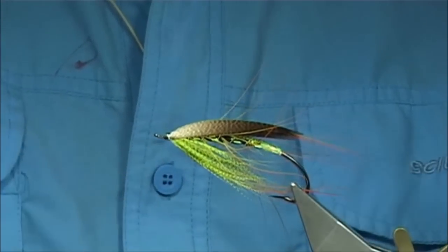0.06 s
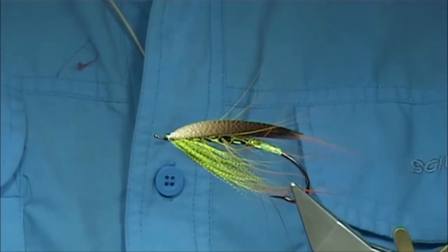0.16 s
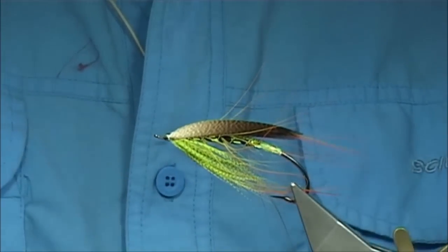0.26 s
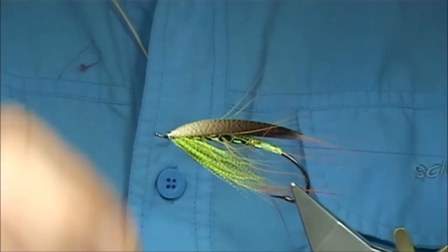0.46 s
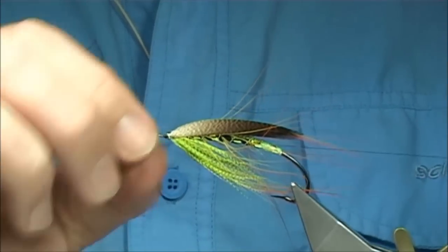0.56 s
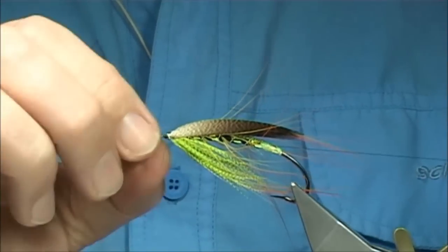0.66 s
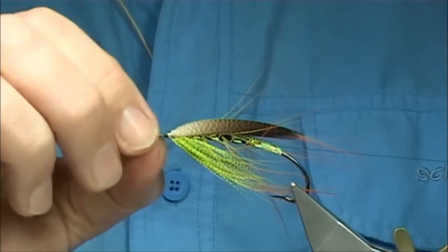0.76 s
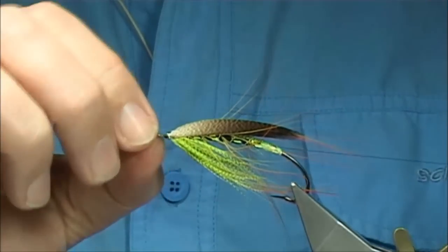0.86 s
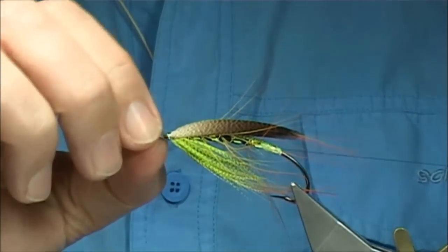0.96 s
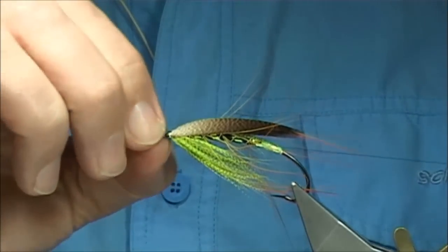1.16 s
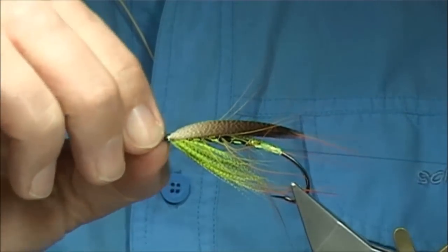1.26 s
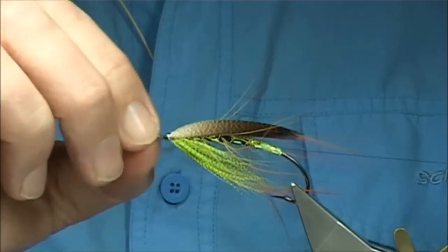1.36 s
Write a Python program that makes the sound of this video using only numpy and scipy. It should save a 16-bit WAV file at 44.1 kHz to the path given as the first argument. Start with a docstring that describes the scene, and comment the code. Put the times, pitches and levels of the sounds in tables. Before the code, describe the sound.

Close by, a small metal tool clatters briefly on a workbench with sharp clicks and a slight ring. A faint cloth rustle and one tiny tick follow, over a low hum in a quiet room.

```python
"""A small metal tool snaps and rattles close by, next to a fly-tying vice.
Each touch of metal makes a sharp click and a tiny scrape, and sets the tool ringing.
Some touches also knock the bench, and a small room echoes the clicks and knocks.
Later a sleeve rustles and fingers bump softly, over a faint mains hum and quiet room noise."""
import sys
import numpy as np
from scipy import signal
from scipy.fft import rfft, irfft
from scipy.io import wavfile
from scipy.ndimage import uniform_filter1d

SR = 44100
rng = np.random.default_rng(int(sys.argv[2]) if len(sys.argv) > 2 else 0)


def bounce(signal):
    """Save signal as a 16-bit WAV file at the path given by the first command-line argument."""
    frames = np.transpose(np.atleast_2d(signal))
    limited = np.clip(frames, -1, 1)
    pcm = np.round(limited * 32767).astype(np.int16)
    wavfile.write(sys.argv[1], SR, pcm)


N = 61739

# Clicks of the tool. Each row: start in seconds, level in dB, bass in dB, treble in dB, strongest pitch
# in Hz, its boost in dB, then the ring, the scrape and the share sent to the room, each in dB.
TOOL_CLICKS = [(.134, -43, -6, 6, 8000, 4, -16, -8, 0), (.24464, -11, -8, -0.5, 4900, 21, -3, -16, -2),
               (.24586, -7, -5.5, -0.5, 4900, 13, -1, -12, -3),
               (.2485, -11.5, -5.5, -1.5, 2410, 14.5, -2, -16, -1.5),
               (.2907, -8.5, 3.5, 3, 4600, 3, -22, -2, 0), (.2917, -9, 0.5, 1, 5000, 3, -10, 1, -1.5),
               (0.2972, -5, -2.5, -2, 4940, 12.5, -12, -11, -2.5),
               (0.3, -9.5, 2, -4.5, 4930, 11.5, -10, -10.5, -0.5),
               (0.3041, -12.5, -4, -1, 5030, 13, -9, -11, -1.5),
               (0.3348, -3.5, -1, 0.5, 4500, 10, -12, -8, 0), (.3358, -6.5, 3, 0, 5230, 7, -14, -6.5, 0),
               (0.3366, -2.5, 1.5, -1, 5150, 11.5, -17, -9, -0.5),
               (.3383, -7, -4.5, 0.5, 3800, 13, -12, -3.5, -2.5),
               (0.3465, 1.5, -1, -4, 4430, 10, -14, -27, -3),
               (.34665, -4, 1.5, 0.5, 8400, 10.5, -18, -26, -4),
               (0.3605, -10.5, 2, -8, 4520, 10, -10, -1, -5.5), (.3675, -12, 0, -3, 5000, 4, -14, -5, -3),
               (0.3779, -5, -6, -3, 4430, 5, -14, -19, -5), (.3951, -11, -2, -3, 4800, 9.5, -8, -4, -3),
               (0.408, -17, -1, -12, 4800, 5, -8, -6, -10), (.4850, -10, -6.5, -5.5, 4680, 10, -7, -15, -3),
               (.4892, -25, -3, -4, 4900, 10, 5, -5, -1), (.4930, -31, -2, -8, 2380, 19.5, 10, -3, 2),
               (1.1737, -42, 3, -2, 4000, 1, -16, -10, 0), (1.177, -36, 8, -4, 2900, 2, -16, -6, 1)]
# The basic tone of a click. Each row: frequency in Hz, level in dB.
CLICK_COLOUR = [(40, -26), (150, -7.5), (600, -6.5), (1200, -6.5), (1700, -1), (2600, -1), (4000, 0),
                (5600, 2.5), (6700, -2.5), (8300, -1), (10000, -5), (11500, -5.5), (15500, -11.5)]
# The ring of the tool. Each row: pitch in Hz, level in dB, seconds to fade by 60 dB.
TOOL_TONES = [(1566, -48, 0.1), (1830, -49, .05), (2200, -48, .16), (2380, -33, .04), (3120, -43, .06),
              (3620, -47, .14), (4510, -49, .12), (4720, -41, .09), (5000, -54, .1), (5800, -45, 0.076),
              (8100, -57, .07), (11470, -44, .04)]
# Knocks on the bench. Each row: start in seconds, level in dB.
BENCH_KNOCKS = [(.2447, -12), (.2912, 3.5), (0.2973, 2.5), (0.3348, -4), (.3462, -3.5), (1.177, -19.5)]
# The ring of the bench. Each row: pitch in Hz, level in dB, seconds to fade by 60 dB.
BENCH_TONES = [(118.2, -45, .14), (155.6, -46, .12), (269, -43.5, 0.082), (465.5, -40, .085),
               (537, -42, 0.066), (654, -39, 0.029), (900, -39, .025), (1593, -45, .06), (2167, -41, 0.023)]
# Finger bumps. Each row: start in seconds, level in dB, pitch in Hz.
FINGER_BUMPS = [(1.031, -47.5, 204), (1.149, -47.5, 139)]
# How the rustle swells and fades. Each row: time in seconds, level in dB.
SLEEVE_LEVELS = [(0, -78), (.42, -74), (.5, -66), (.72, -62.5), (.84, -67), (.97, -64.5), (1.1, -75),
                 (1.4, -74)]
# The tone of the rustle. Each row: frequency in Hz, level in dB.
RUSTLE_COLOUR = [(40, -28), (130, -9), (260, 0), (450, -8), (1000, -21), (4000, -31), (15000, -43)]
# How long the room's echo lasts. Each row: frequency in Hz, seconds to fade by 60 dB.
TAIL_FADE = [(150, 0.28), (600, 0.3564), (2000, 0.3658), (4500, 0.2945), (8000, 0.2432), (15000, 0.23)]
# The tone of that echo. Each row: frequency in Hz, level in dB.
TAIL_COLOUR = [(100, -3), (600, -0.5), (1800, .5), (3200, 2.5), (5000, 0.5), (8000, -2), (15000, -3)]
# First echoes off nearby surfaces. Each row: delay in seconds, level in dB.
FIRST_ECHOES = [(.0026, -15.5), (.0042, -19.5), (.0071, -21), (.0088, -26), (0.0141, -25)]
# The tone of the room noise. Each row: frequency in Hz, level in dB.
AIR_COLOUR = [(25, -20), (38, -14), (50, -5), (70, -7), (100, -3), (200, -6), (350, -11.5), (700, -16.5),
              (1200, -21), (2300, -25.5), (6000, -30.8), (15500, -35.7)]
# The mains hum. Each row: pitch in Hz, level in dB.
HUM_TONES = [(99, -68.5), (199.5, -69), (350, -77.5), (700, -82.5)]

BASS_HZ, TREBLE_HZ, PEAK_WIDTH_HZ, PEAK_STEEPNESS = 1280, 7040, 570, 1.29
SCRAPE_S, SMEAR_S = 0.0017, 0.0005
KNOCK_RISE_S, BENCH_LOW_HZ, BUMP_RISE_S = 0.00063, 75, 0.0034
TAIL_DB, TAIL_RISE_S, BENCH_ROOM_DB = -5, 0.0051, -3
AIR_DB, AIR_DRIFT_DB, HUM_WAVER = -58.4, 1.2, 0.5
PEAK_IN_ROOM = 0.25  # the strongest pitch beams forward, so the room gets only this share of its boost


def tool():
    """Each touch is a tap and a brief scrape. The tool rings and the room echoes the click."""
    direct, to_room = np.zeros(N), np.zeros(N)
    t, ringing = np.arange(SR // 20) / SR, ring(TOOL_TONES)
    for start, db, bass_db, treble_db, peak_hz, peak_db, ring_db, scrape_db, room_db in TOOL_CLICKS:
        scrape = rng.standard_normal(len(t)) * np.exp(-t / SCRAPE_S)
        force = signal.unit_impulse(len(t)) + amp(scrape_db) * scrape / np.linalg.norm(scrape)
        near_click = click(bass_db, treble_db, peak_hz, peak_db)
        room_click = click(bass_db, treble_db, peak_hz, peak_db * PEAK_IN_ROOM)
        add(direct, start, amp(db) * signal.fftconvolve(force, near_click))
        add(direct, start, amp(db + ring_db) * ringing)
        add(to_room, start, amp(db + room_db) * signal.fftconvolve(force, room_click))
    return direct + room(to_room)


def click(bass_db, treble_db, peak_hz, peak_db):
    """One sharp pulse. The metal makes one pitch stand out and smears the pulse a little."""
    hz = np.fft.rfftfreq(1024, 1 / SR)
    bass = bass_db / (1 + (hz / BASS_HZ) ** 2)
    treble = treble_db * (1 - 1 / (1 + (hz / TREBLE_HZ) ** 6))
    off_peak = 2 * (hz - peak_hz) / PEAK_WIDTH_HZ
    peak_power = 1 + (amp(peak_db) ** 2 - 1) / (1 + off_peak ** 2) ** PEAK_STEEPNESS
    pulse = sharp_pulse(read(CLICK_COLOUR, hz) + bass + treble + 10 * np.log10(peak_power))
    delay = SMEAR_S * (hz / hz[-1]) ** 2  # higher pitches arrive later
    return irfft(rfft(pulse) * np.exp(-2j * np.pi * np.cumsum(delay) * hz[1]))


def sharp_pulse(db):
    """The sharpest pulse with these levels from low to high, silent before it starts."""
    cepstrum = irfft(np.log(amp(db)))
    half = len(cepstrum) // 2
    cepstrum[1:half] *= 2  # move the part before the start to after it
    cepstrum[half + 1:] = 0
    return irfft(np.exp(rfft(cepstrum)))


def ring(tones):
    """A struck object rings with several pure tones, each fading at its own speed."""
    t = np.arange(SR // 2) / SR
    return sum(amp(db) * np.exp(-np.log(1000) * t / fade_s) * np.sin(2 * np.pi * hz * t)
               for hz, db, fade_s in tones)


def bench():
    """Knocks set the bench ringing with low tones, but it gives off little deep bass."""
    out, knock = np.zeros(N), ring(BENCH_TONES)
    knock *= 1 - np.exp(-np.arange(len(knock)) / SR / KNOCK_RISE_S)
    for start, db in BENCH_KNOCKS:
        add(out, start, amp(db) * knock)
    return signal.sosfilt(signal.butter(1, BENCH_LOW_HZ, "high", fs=SR, output="sos"), out)


def fingers():
    """Soft, dull bumps as the fingers settle at the vice."""
    out, t = np.zeros(N), np.arange(SR // 10) / SR
    swell = t / BUMP_RISE_S * np.exp(1 - t / BUMP_RISE_S)
    for start, db, hz in FINGER_BUMPS:
        add(out, start, -amp(db) * swell * np.sin(2 * np.pi * hz * t))
    return out


def sleeve():
    """Cloth gives a dull rustle as the arm moves in."""
    level_db = np.interp(np.arange(N) / SR, *np.transpose(SLEEVE_LEVELS))
    return amp(level_db) * noise(RUSTLE_COLOUR)


def room(sound):
    """A few quick echoes and a smooth tail of sound whose highest pitches fade first."""
    hz, t, bands = signal.stft(rng.standard_normal(SR), SR, nperseg=256)
    colour = amp(read(TAIL_COLOUR, hz))[:, None]
    fade = np.exp(-np.log(1000) * t / read(TAIL_FADE, hz)[:, None])
    tail = signal.istft(bands * colour * fade, SR, nperseg=256)[1]
    tail *= 1 - np.exp(-(np.arange(len(tail)) / SR / TAIL_RISE_S) ** 2)
    tail *= amp(TAIL_DB) / np.linalg.norm(tail)
    for delay, db in FIRST_ECHOES:
        add(tail, delay, amp([db]))
    return signal.fftconvolve(sound, tail)[:N]


def room_noise():
    """A quiet rush whose low end slowly rises and falls."""
    air = noise(AIR_COLOUR)
    low = signal.sosfilt(signal.butter(1, 600, fs=SR, output="sos"), air)
    return amp(AIR_DB) * (air + low * (amp(AIR_DRIFT_DB * drift(samples=3000)) - 1))


def mains_hum():
    """Mains power hums faintly, each tone wavering in loudness."""
    t, hum = np.arange(N) / SR, np.zeros(N)
    for hz, db in HUM_TONES:
        waver = 1 + HUM_WAVER * drift(samples=4000)
        hum += amp(db) * unit(waver * np.sin(2 * np.pi * (hz * t + rng.random())))
    return hum


def noise(colour):
    """Steady noise of strength 1, with its tone set by a table."""
    gain = amp(read(colour, np.fft.rfftfreq(N, 1 / SR)))
    return unit(irfft(rfft(rng.standard_normal(N)) * gain, N))


def drift(samples):
    """A random wander of strength 1. Smoothing over more samples makes it slower."""
    smooth = uniform_filter1d(rng.standard_normal(N), samples, mode="wrap")
    return unit(uniform_filter1d(smooth, samples, mode="wrap"))


def amp(db):
    """Turns decibels into a number to multiply by."""
    return 10 ** (np.asarray(db) / 20)


def unit(sound):
    """Scales a sound to an average strength (rms) of 1."""
    return sound / np.sqrt(np.mean(sound ** 2) + 1e-20)


def read(table, hz):
    """Looks up values between a table's rows, spacing the frequencies by octaves."""
    row_hz, values = np.transpose(table)
    return np.interp(np.log(hz + 1), np.log(row_hz + 1), values)


def add(mix, start, sound):
    """Mixes a sound in at a start time in seconds."""
    part = mix[round(start * SR):][:len(sound)]
    part += sound[:len(part)]


def scene():
    """Tool, bench, fingers and sleeve in the quiet room, in one channel."""
    knocks = bench()
    hits = tool() + knocks + amp(BENCH_ROOM_DB) * room(knocks)
    return (hits + fingers() + sleeve() + room_noise() + mains_hum())[None]


def record(dry):
    """Cuts the very highest treble, above 15600 Hz."""
    treble_cut = signal.firwin(255, 15600, window=("kaiser", 8), fs=SR)
    return signal.oaconvolve(dry, treble_cut[None], "same")


dry = scene()
out = record(dry)
bounce(out)
```